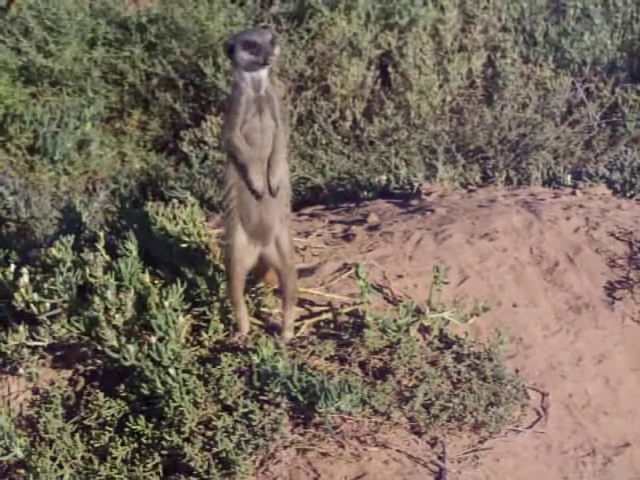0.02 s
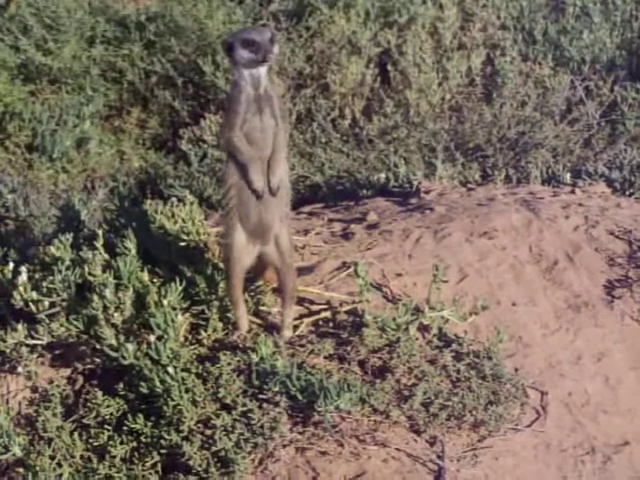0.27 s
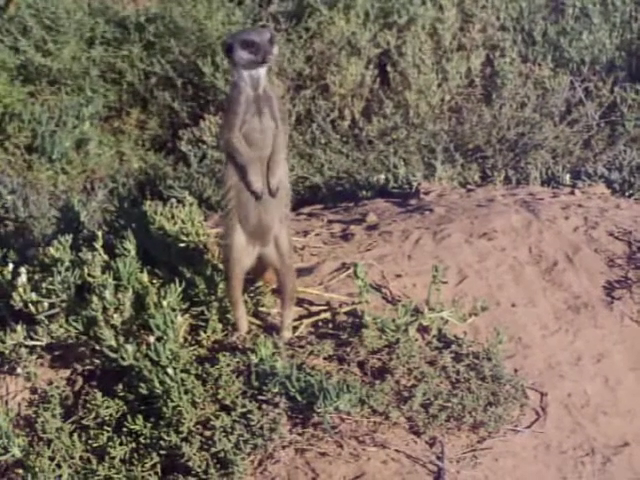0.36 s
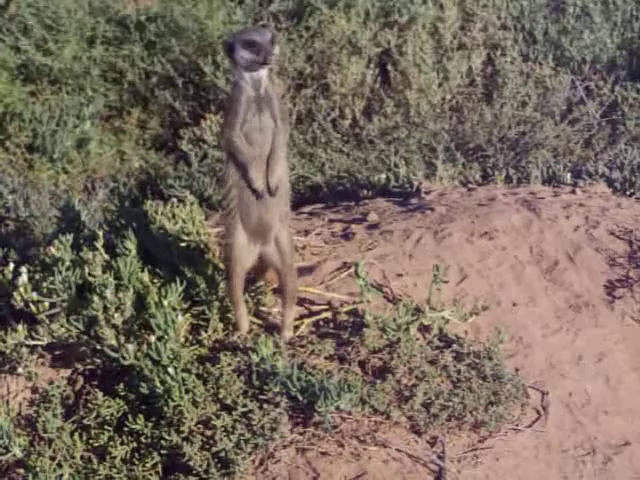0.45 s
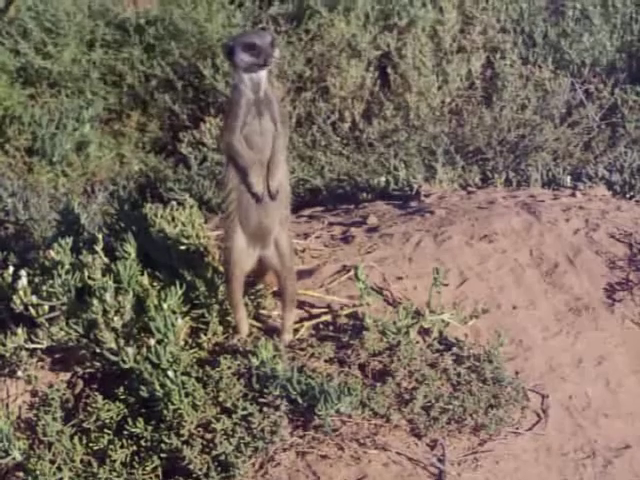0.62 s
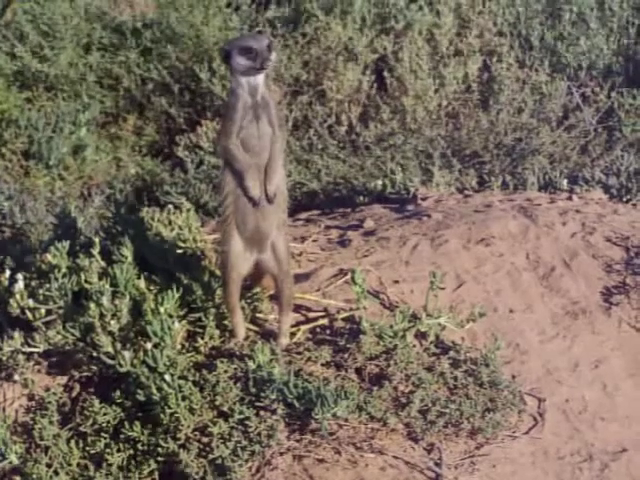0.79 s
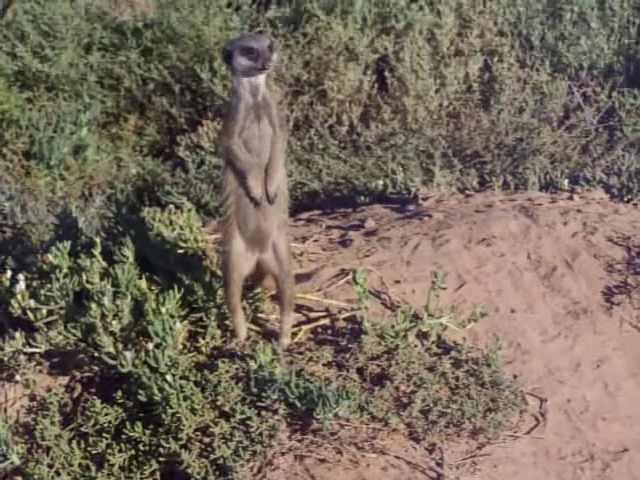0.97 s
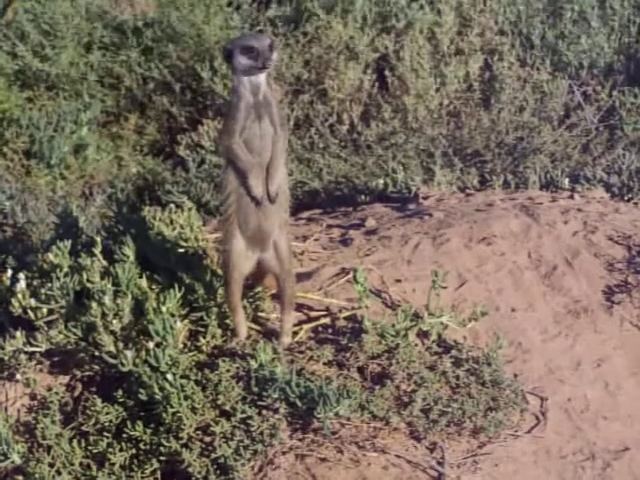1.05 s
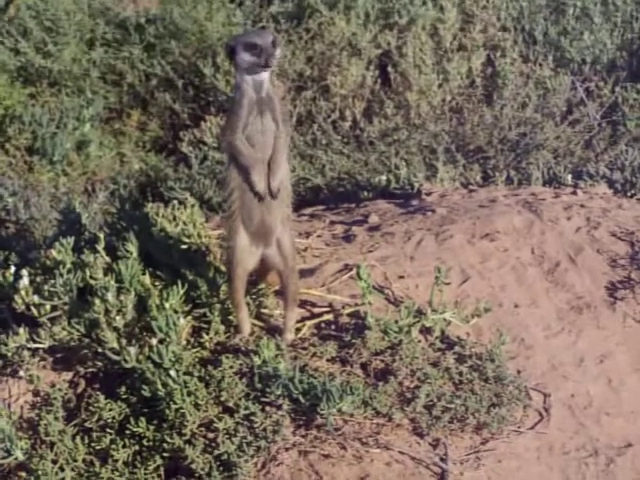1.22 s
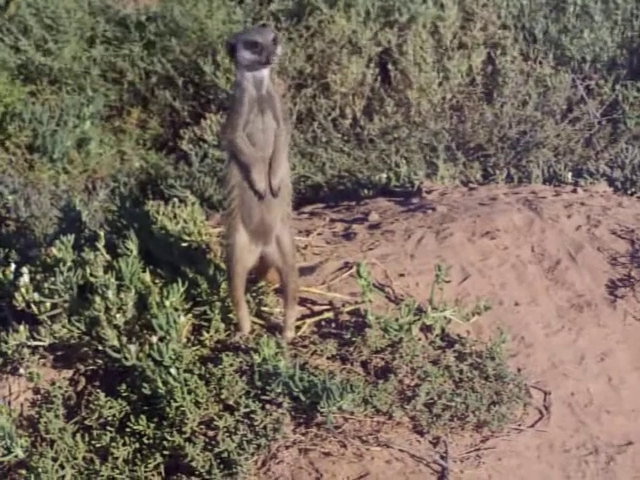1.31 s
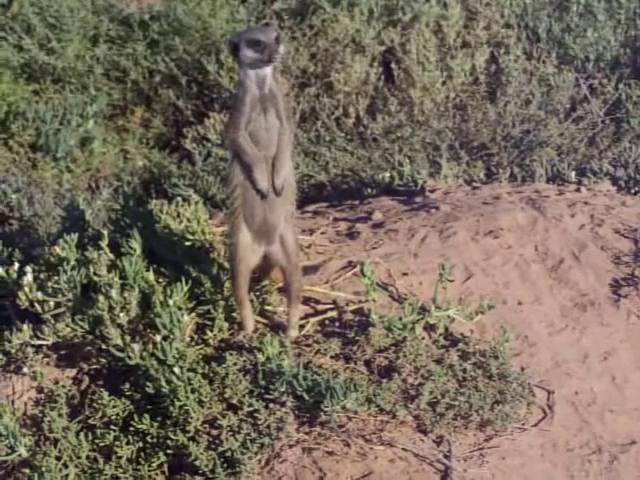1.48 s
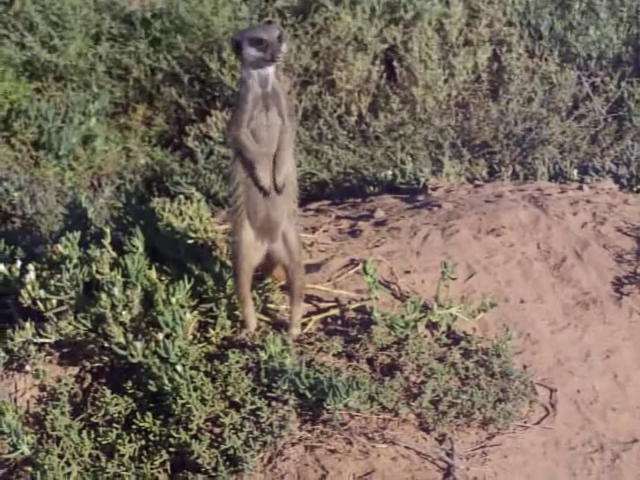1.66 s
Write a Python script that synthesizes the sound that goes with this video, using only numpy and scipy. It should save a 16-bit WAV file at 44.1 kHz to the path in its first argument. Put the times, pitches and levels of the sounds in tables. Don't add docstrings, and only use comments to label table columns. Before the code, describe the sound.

Four abrupt, harsh meerkat barks come about 0.4 seconds apart, rising in pitch with a rough flutter. Short bush scatter and a very thin echo follow, with faint bird whistles, tiny dry ticks and a distant drone, in mono.

```python
import sys
import numpy as np
from scipy import signal
from scipy.fft import rfft, irfft
from scipy.io import wavfile
from scipy.ndimage import uniform_filter1d, map_coordinates

SR = 44100
rng = np.random.default_rng(int(sys.argv[2]) if len(sys.argv) > 2 else 0)


def store_wav(level_fs):
    pcm = np.round(np.clip(np.atleast_2d(level_fs), -1, 1) * 32767)
    wavfile.write(sys.argv[1], SR, pcm.T.astype(np.int16))


def volts_from_db(level):
    exponent = np.asarray(level, float) / 20
    return 10 ** exponent


N = 74970


def band(x, hz, width):
    return signal.lfilter(*signal.iirpeak(hz, hz / width, fs=SR), x)


def unit(x):
    return x / np.sqrt(np.mean(x ** 2))


def walk(rate):
    k = int(SR / rate)
    smooth = uniform_filter1d(rng.standard_normal(N), k)
    return unit(uniform_filter1d(smooth, k))


def curve(t, rows, col=1):
    return np.interp(t, [r[0] for r in rows], [r[col] for r in rows])


def colour_gain(hz, rows):
    return volts_from_db(np.interp(np.log(hz), np.log([r[0] for r in rows]), [r[1] for r in rows]))


def swell(t, db, rise, fall):
    round_s = 0.0073
    bend = np.hypot(t, round_s) - round_s
    return volts_from_db(np.maximum(db - np.where(t < 0, rise, fall) * bend, -200))


def shaken_pitch(t, trill):
    # seconds from the bark's peak, pitch in Hz.
    pitch_rise = [(-.06, 640), (-.04, 720), (-.022, 810), (0, 885), (.025, 905), (.06, 920)]
    # seconds from the bark's peak, pitch swing per beat as a share of the pitch.
    shake = [(-.05, .05), (-.02, .06), (0, .12), (.06, .12)]
    swing = curve(t, shake) * np.cos(trill - 0.3)
    jitter = 0.014 * walk(590)
    pitch = curve(t, pitch_rise) * (1 + swing + jitter)
    return 2 * np.pi * np.cumsum(pitch) / SR


def voice(t, db, phase, shut):
    # level in dB, peak lag in seconds, rise in dB/s, fall in dB/s.
    partials = [(-11, -0.018, 482, 427.5), (-5, 0.00011, 859, 627), (-5, -0.00056, 991, 522),
                (-27, 0.014, 896, 677)]
    # dip between beats in dB, rasp as a share of the tone.
    grain = [(11, .4), (11, .17), (2, .7), (5, .9)]
    rasp_hz = 800
    out = 0
    for k, (p_db, lag, rise, fall) in enumerate(partials):
        dip_db, rasp = grain[k]
        angle = (k + 1) * phase
        tone = np.sin(angle) * (1 + rasp * walk(rasp_hz)) + np.cos(angle) * rasp * walk(rasp_hz)
        out = out + swell(t - lag, db + p_db - dip_db * shut, rise, fall) * tone
    return out


def upper_throat(t, db, phase, shut):
    # early pitch in Hz, late pitch in Hz, width in Hz.
    throat_hz = [(5700, 5500, 450), (7420, 7300, 350), (4300, 4300, 2400), (8450, 8450, 900),
                 (7950, 7900, 700), (6780, 6680, 350)]
    # level in dB, peak lag in seconds, rise in dB/s, fall in dB/s.
    throat_swell = [(-23.5, -0.014, 791.5, 329), (-19, -0.0022, 902, 907.5), (-19, -0.0069, 988.5, 889),
                    (-19.5, -0.0046, 901.5, 898.5), (-35.5, -0.0038, 1198, 597.5), (-27.5, 0.02, 699, 495)]
    breathy, beat_dip_db = 0.88, 4
    gate = breathy + (1 - breathy) * 2 * np.cos(phase)
    out = 0
    for (early_hz, late_hz, width_hz), (t_db, lag, rise, fall) in zip(throat_hz, throat_swell):
        hz = np.interp(t, [-.04, .04], [early_hz, late_hz])
        ring = 2 * np.pi * np.cumsum(hz) / SR
        puff = walk(width_hz) * np.cos(ring) + walk(width_hz) * np.sin(ring)
        out = out + swell(t - lag, db + t_db - beat_dip_db * shut, rise, fall) * gate * puff
    return out


def mouth(x):
    # pitch in Hz, gain in dB.
    mouth_gain = [(480, -28.5), (600, 0.5), (850, -0.5), (1150, 9), (1600, 11), (1900, 5.5), (2650, -2.5),
                  (3000, -10.5), (3800, -6.5)]
    f = np.fft.rfftfreq(N, 1 / SR) + 1
    return irfft(rfft(x) * colour_gain(f, mouth_gain), N)


def barks():
    # loudest moment in seconds, level in dB, lead-in before that moment in seconds.
    peaks = [
        (.231, -12, 0.053),
        (0.639, -13.5, .056),
        (1.038, -13, 0.067),
        (1.412, -12, 0.065),
    ]
    # loudest trill beat in seconds, trill speed there in Hz.
    beats = [(.2315, 89), (.6388, 87), (1.0415, 86), (1.4062, 90)]
    slowing = 330
    out = 0
    for (beat_s, trill_hz), (peak_s, db, lead_s) in zip(beats, peaks):
        s = np.clip(np.arange(N) / SR - beat_s, -.2, .2)
        t = np.arange(N) / SR - peak_s
        level = db + np.clip((t + lead_s) * 3000, -60, 0)
        trill = 2 * np.pi * (trill_hz * s - slowing * s ** 2 / 2)
        shut = (.5 - .5 * np.cos(trill)) ** 2
        phase = shaken_pitch(t, trill)
        out = out + voice(t, level, phase, shut) + upper_throat(t, level, phase, shut)
    return mouth(out)


def scatter_tail():
    t = np.arange(SR // 2) / SR

    def fade(t60):
        return rng.standard_normal(len(t)) * volts_from_db(-60 * t / t60) * volts_from_db(3.5 * walk(120)[:len(t)])

    bush = fade(0.12) * np.minimum(t / 0.027, 1)
    low = band(fade(0.41), 905, 300)
    return volts_from_db(-18) * bush / np.linalg.norm(bush) + volts_from_db(-24.5 - 4) * low / np.linalg.norm(low)


def bank_echo(x):
    delay_s, echo_hz, width_hz = .1, 2580, 400
    late = map_coordinates(x, [np.arange(N) - delay_s * SR], order=1, mode="nearest")
    return volts_from_db(-33) * band(band(late, echo_hz, width_hz), echo_hz, width_hz)


def outdoors(x):
    # cancelled pitch in Hz, width in Hz.
    throat_dips = [(1285, 170), (2150, 180)]
    x = x + signal.fftconvolve(x, scatter_tail())[:N] + bank_echo(x)
    for hz, width in throat_dips + throat_dips:
        x = x - .88 * band(x, hz, width)
    return x


def whistled(rows, flutter_db):
    t = np.arange(N) / SR
    hz = uniform_filter1d(curve(t, rows), 130) * (1 + 0.0059 * walk(250))
    sounding = (t > rows[0][0]) & (t < rows[-1][0])
    on = uniform_filter1d(1. * sounding, 90)
    level = volts_from_db(curve(t, rows, col=2) + 5.5 + flutter_db * walk(170))
    return on * level * np.sin(2 * np.pi * np.cumsum(hz) / SR)


def birds():
    # time in seconds, pitch in Hz, level in dB.
    long_whistle = [(.724, 4705, -58), (.733, 3700, -63), (.755, 3170, -64), (.787, 3750, -47.5),
                    (.791, 4140, -47), (.85, 3770, -54), (.872, 3920, -50.5), (.898, 4840, -52.5),
                    (.911, 4300, -50.5), (.92, 2807, -54)]
    # time in seconds, pitch in Hz, level in dB.
    chirps = [
        [(.078, 4450, -69), (.085, 4600, -49.5), (.093, 5170, -53.5), (.104, 5800, -61)],
        [(.306, 4250, -54), (.312, 4550, -51.5), (.321, 5170, -53.5), (.332, 5800, -66)],
        [(.33, 2900, -68), (.338, 3300, -62), (.346, 4300, -63), (.37, 4450, -65), (.4, 4100, -73),
         (.435, 3800, -69)],
        [(.955, 2650, -62), (.965, 2750, -64), (.985, 2650, -76), (.997, 3100, -53.5), (1.005, 4000, -49),
         (1.014, 4650, -49), (1.021, 4900, -49), (1.033, 4050, -50), (1.04, 3200, -66)],
        [(1.122, 2700, -68), (1.131, 3450, -55), (1.137, 4250, -47), (1.144, 4750, -48), (1.15, 4950, -49),
         (1.159, 4300, -49), (1.165, 2970, -52)],
    ]
    # time in seconds, pitch in Hz, level in dB.
    answers = [
        [(.29, 1000, -62), (.36, 880, -61), (.42, 800, -57), (.445, 770, -68)],
        [(1.09, 1000, -60), (1.15, 880, -61), (1.19, 760, -60), (1.21, 720, -68)],
    ]
    out = 0
    for rows in [long_whistle] + chirps:
        out = out + whistled(rows, flutter_db=1.5)
    for rows in answers:
        out = out + whistled(rows, flutter_db=3.5)
    return out


def ticks():
    # peak in seconds, level in dB, pitch in Hz, time to fade by 20 dB in seconds.
    snaps = [
        (.0146, -32, 1400, .004),
        (1.622, -46, 500, .006),
        (.208, -44, 370, .05),
        (1.511, -44, 2550, .01),
        (1.531, -42, 2500, .012),
        (.729, -43, 2550, .009),
        (1.134, -44, 2550, .009),
    ]
    t, out = np.arange(N) / SR, 0
    for s, db, hz, fade_s in snaps:
        away = np.abs(t - s) * np.where(t < s, 3, 1)
        level = volts_from_db(db - 20 * np.minimum(away, .1) / fade_s)
        out = out + level * np.cos(2 * np.pi * hz * (t - s))
    return out


def murmur():
    # time in seconds, level in dB.
    drone_level = [(0, -54), (0.149, -58), (0.498, -64), (.9, -66.5), (1.299, -58.5), (1.551, -55.5),
                   (1.7, -61)]
    level = volts_from_db(curve(np.arange(N) / SR, drone_level) + 2.4 * walk(70))
    return level * unit(band(rng.standard_normal(N), 776, 250))


def air():
    # pitch in Hz, noise level in dB per Hz.
    air_colour = [(15, -47), (25, -9.5), (73, -8.5), (436, -13.5), (599, -15), (677, -17.5), (865, -20.5),
                  (6110, -25.5), (8600, -33), (11200, -71), (18900, -120)]
    # pitch in Hz, width in Hz, level in dB.
    engine_hum = [(67.6, 34, -51.5), (149.3, 21, -59.5)]
    f, hiss = np.fft.rfftfreq(N, 1 / SR) + 1, 0
    colour = colour_gain(f, air_colour)
    for hz in 25 * 2 ** np.arange(0, 9, .5):
        share = np.maximum(1 - np.abs(2 * np.log2(f / hz)), 0) ** .5
        noise = irfft(rfft(rng.standard_normal(N)) * colour * share, N)
        hiss = hiss + noise * volts_from_db(0.99 * walk(18))
    hum = sum(volts_from_db(db) * unit(band(rng.standard_normal(N), hz, w)) for hz, w, db in engine_hum)
    return volts_from_db(-53.5) * unit(hiss) + hum


def scene():
    return (outdoors(barks()) + birds() + ticks() + murmur() + air())[None]


def low_pass(x):
    return signal.sosfilt(signal.butter(12, 9180, fs=SR, output="sos"), x)


def record(dry):
    top_cut = signal.cheby2(10, 60, 9500, fs=SR, output="sos")
    mix = signal.sosfilt(top_cut, dry)
    return low_pass(mix)


dry = scene()
out = record(dry)
store_wav(out)
```